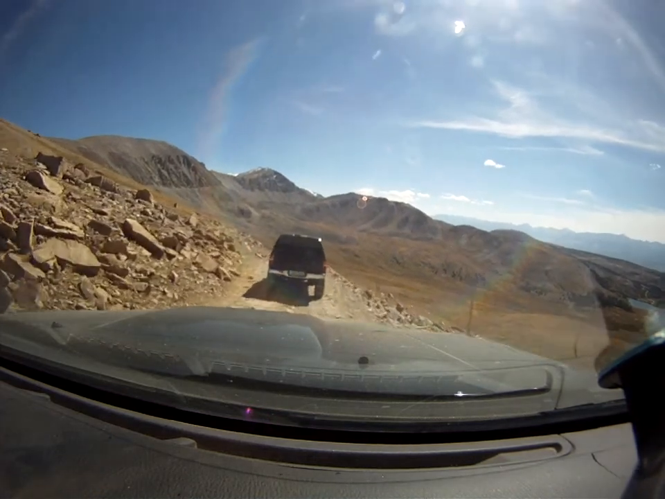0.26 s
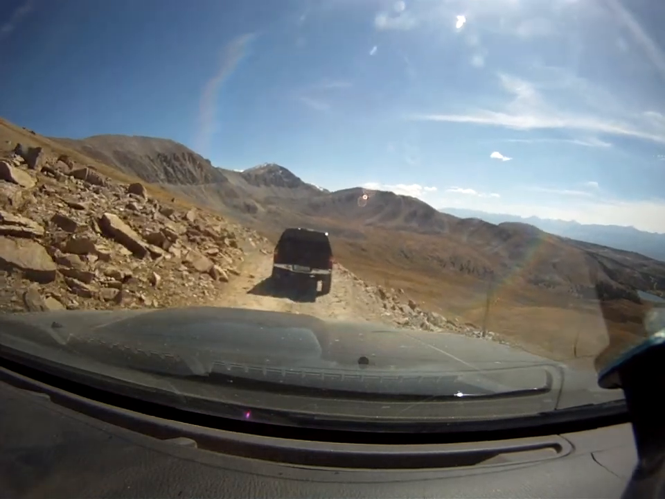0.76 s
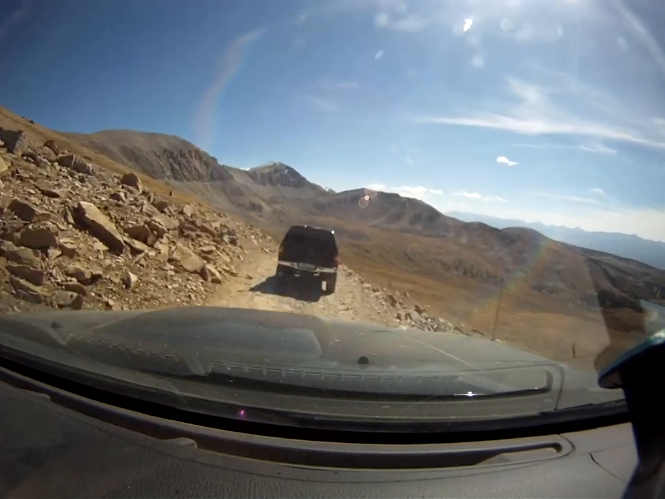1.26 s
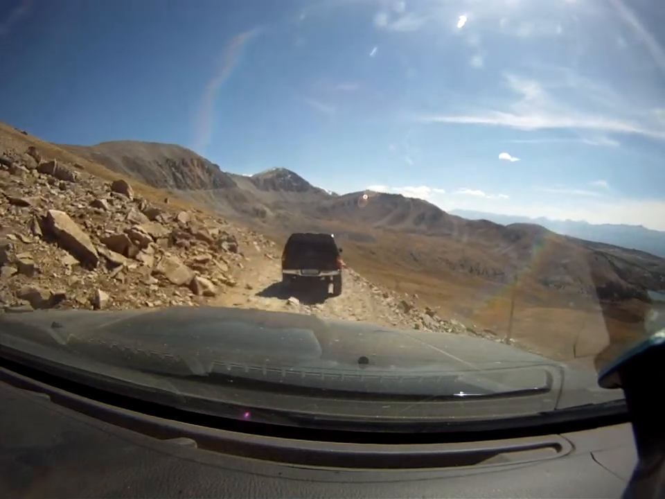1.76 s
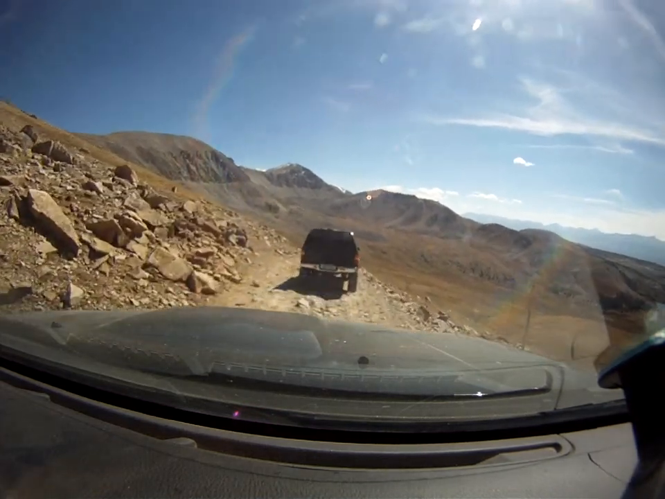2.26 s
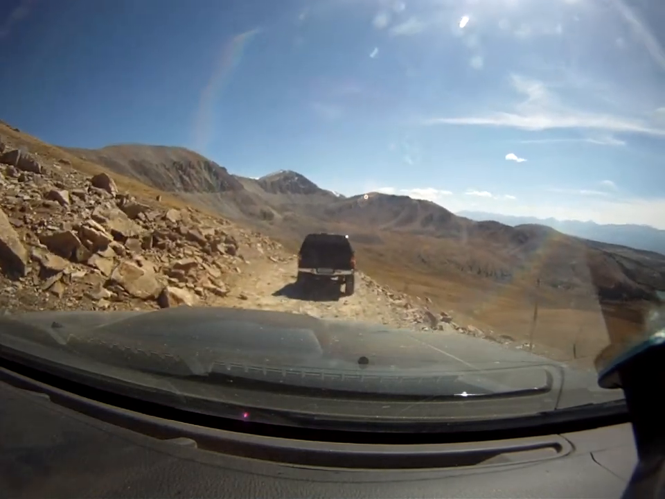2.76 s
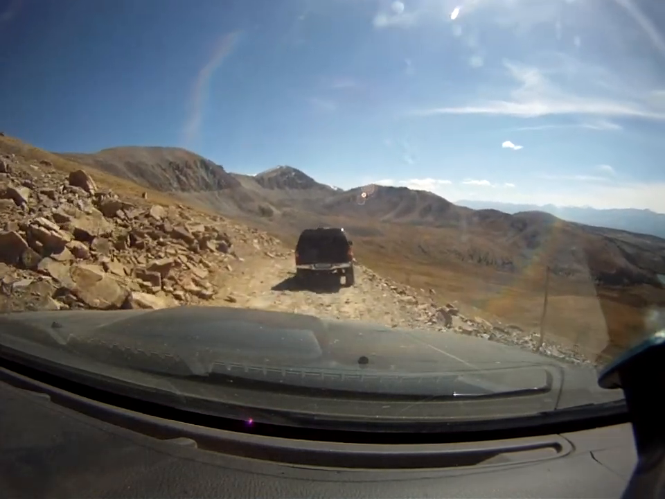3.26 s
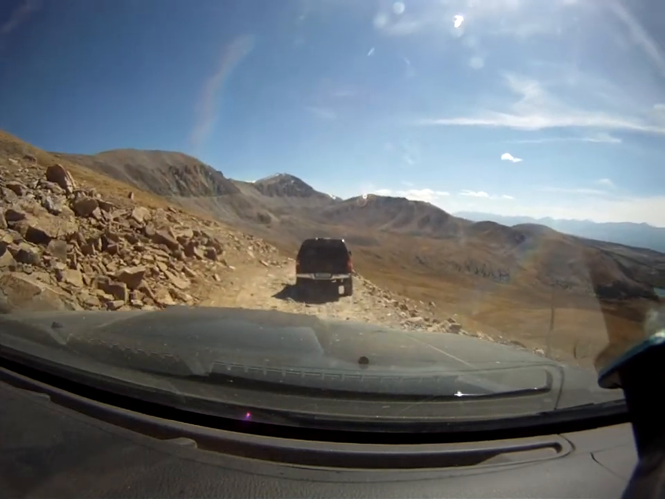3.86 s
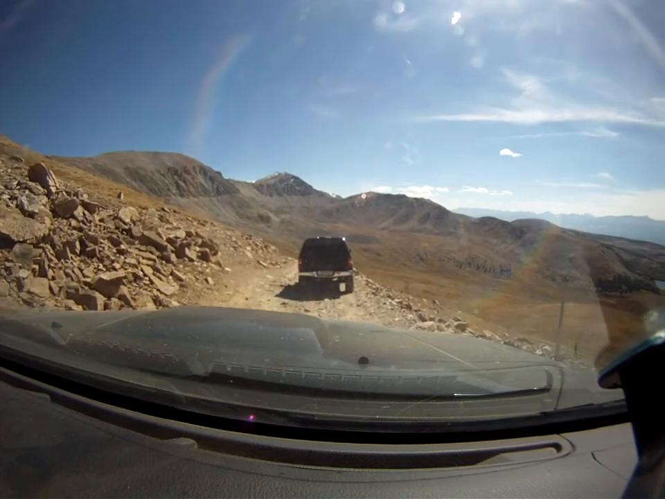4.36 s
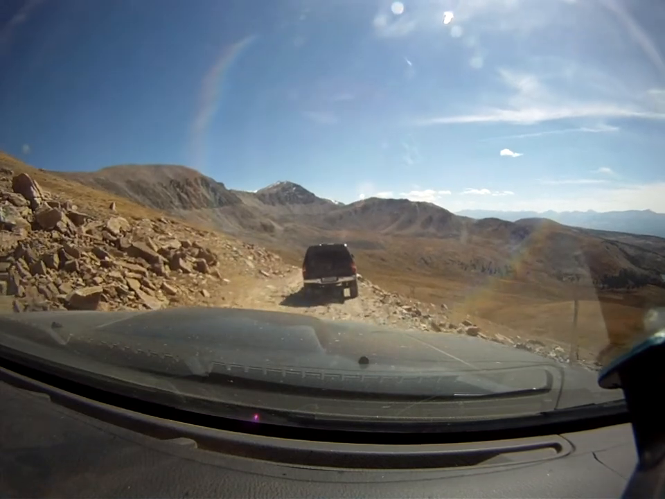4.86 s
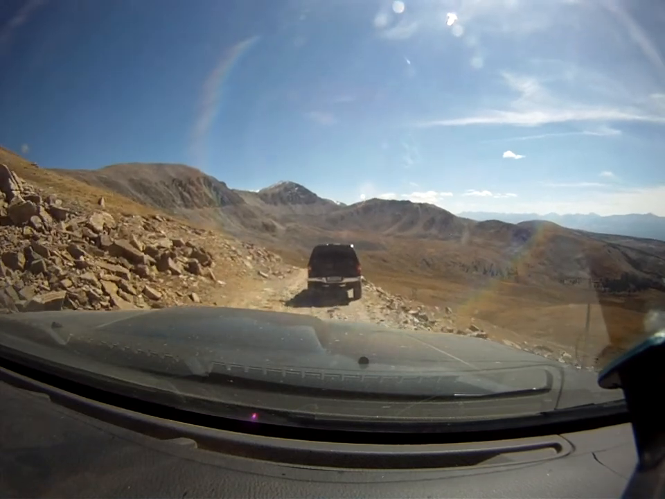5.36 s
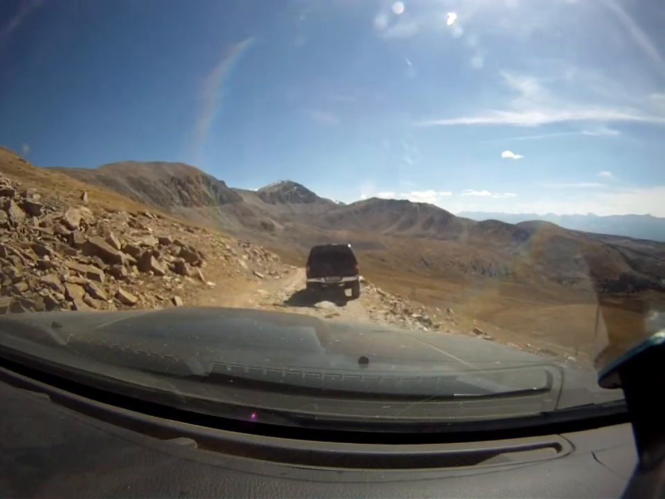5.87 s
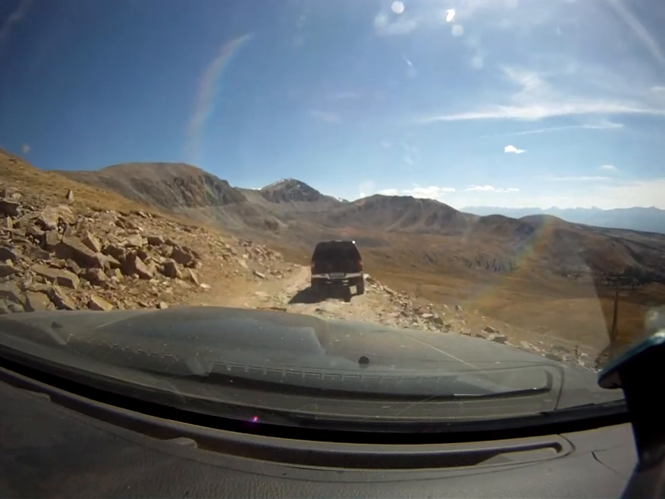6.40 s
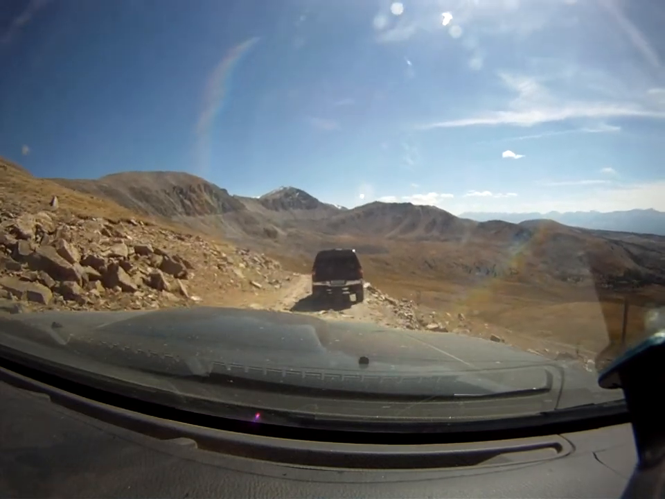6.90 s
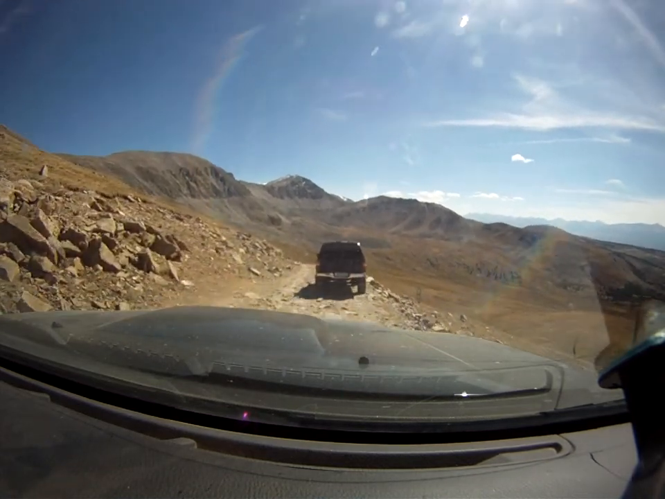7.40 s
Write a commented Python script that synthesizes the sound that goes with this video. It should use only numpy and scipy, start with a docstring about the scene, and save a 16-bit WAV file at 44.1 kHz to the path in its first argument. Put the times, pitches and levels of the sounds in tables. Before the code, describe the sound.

Inside a four-wheel drive crawling over rocks, a deep rumble and engine hum carry on under knocks, rattles and crunching stones.

```python
"""A deep rumble and an engine's hum fill the cab of a four-wheel drive crawling over a rocky track.
The body vibrates on its springs and booms as wheels drop off rocks; the hum sinks as the engine slows.
Tyres grind over loose stones, impacts of gear and trim ring the panels, and rubbing plastic squeaks.
A camera on the dashboard hears it all and holds each sample, which adds a thin fizz on top."""
import sys
import numpy as np
from scipy import signal
from scipy.fft import rfft, irfft, next_fast_len
from scipy.io import wavfile
from scipy.ndimage import uniform_filter1d, map_coordinates

SR = 44100
rng = np.random.default_rng(int(sys.argv[2]) if len(sys.argv) > 2 else 0)


def wrap_up_sound(samples):
    """Save the sound to the file named by the first command line argument, as 16-bit audio."""
    columns = np.atleast_2d(samples).T
    # keep every value between -1 and 1, then stretch to whole-number steps
    tamed = np.clip(columns, -1, 1)
    steps = np.round(tamed * 32767).astype(np.int16)
    wavfile.write(sys.argv[1], SR, steps)


N = 336924


# shaking of the body: t/s, relative level/dB
SHAKE_LEVELS = [(0.0, -33.5), (0.74, -27.5), (1.51, -34.5), (2.11, -39), (2.32, -33.5), (4.21, -35),
                (4.43, -41), (4.66, -37.5), (4.87, -36), (5.47, -33), (7.11, -39), (7.43, -35.5),
                (7.64, -37)]
# spectrum of the rumble: f/Hz, relative density/dB
RUMBLE_SPECTRUM = [(10, -4.5), (22, -2.5), (32, -0.5), (48, 0.5), (58, -4), (76, -12), (95, -13.5),
                   (140, -19), (190, -43), (300, -51)]
def body(gain_db=3.0, evenness=0.81, lurch_db=0.64):
    """Forced vibration: the ground shakes the body on its springs, harder where it is rough."""
    shake_db, = curves(SHAKE_LEVELS)
    sway = coloured(rng.standard_normal(N), RUMBLE_SPECTRUM)
    envelope = np.sqrt(np.abs(uniform_filter1d(sway ** 2, size=4000)) + 1e-6)
    return amp(shake_db + gain_db + lurch_db * wobble(9.7)) * unit(sway / envelope ** evenness)


# wheels drop off rocks: t/s, peak level/dB
WHEEL_DROPS = [(1.756, -23), (2.46, -23.5), (2.558, -21.5), (3.529, -29), (5.426, -19), (5.5, -25.5),
               (5.842, -16.5)]
def jolts(boom_hz=43, rise_s=0.024):
    """Transient response: each drop sets the cab booming for a few cycles."""
    out, t = np.zeros(N), np.arange(SR // 3) / SR
    envelope = (t / rise_s * np.exp(1 - t / rise_s)) ** 2
    for s, db in WHEEL_DROPS:
        add(out, s, amp(db) * envelope * np.sin(2 * np.pi * boom_hz * t))
    return out


# the fundamental under changing load: t/s, level/dB
ENGINE_LOAD = [(0, -34), (.75, -37.5), (1.45, -33), (1.9, -36.5), (3.1, -35.5), (4.1, -42), (4.35, -34),
               (4.9, -38), (5.45, -45.5), (5.95, -38), (6.45, -43.5), (6.95, -46), (7.64, -39)]
# harmonics 2 and 3 in the cab: level off resonance/dB, resonance f/Hz, bandwidth/Hz, lift/dB
CAB_RESONANCES = [(-56.5, 239.3, 4.2, 12.5), (-61.5, 356, 14, 11)]
# one surge of harmonic 2: t/s, half-width/s, lift/dB
HARMONIC_SURGE = (4.76, 0.12, 11.4)
def engine(start_hz=125.86, sag_hz_per_s=2.06, waver_db=1.33, overtone_waver_db=2.2):
    """Resonance: as the firing rate sags, two harmonics slide through modes of the cab and swell."""
    t = np.arange(N) / SR
    firing_hz = start_hz - sag_hz_per_s * t
    phase = 2 * np.pi * np.cumsum(firing_hz * (1 + .002 * wobble(12))) / SR
    levels = [curves(ENGINE_LOAD)[0] + waver_db * wobble(14)]
    for k, (db, centre_hz, width_hz, lift_db) in enumerate(CAB_RESONANCES, 2):
        swell_db = lift_db * resonance(k * firing_hz, centre_hz, width_hz)
        levels.append(db + swell_db + overtone_waver_db * wobble(9))
    surge_s, half_width_s, surge_db = HARMONIC_SURGE
    levels[1] += surge_db * np.exp(-((t - surge_s) / half_width_s) ** 2)
    return sum(amp(db) * np.sqrt(2) * np.sin(k * phase + rng.uniform(0, 2 * np.pi))
               for k, db in enumerate(levels, 1))


# tyres on the track: t/s, roll level/dB, relative grit level/dB
TRACK_LEVELS = [(0.0, -39.5, -55.5), (0.51, -41, -57), (0.76, -40.5, -56.5), (1.13, -41.5, -55.5),
                (1.62, -44.5, -59), (2.49, -43, -56.5), (2.7, -44, -58.5), (3.94, -41, -57.5),
                (4.4, -45.5, -59.5), (5.62, -43, -60), (5.98, -44, -55.5), (6.92, -45.5, -59),
                (7.28, -42, -54.5), (7.64, -45.5, -57)]
# spectra of roll, grit and sand: f/Hz, relative density/dB
ROLL_SPECTRUM = [(90, -13), (150, 8), (200, 3), (300, 4), (400, 0), (500, -0.5), (570, -7.5), (690, -17.5),
                 (850, -19), (1000, -29.5), (2000, -61)]
GRIT_SPECTRUM = [(300, -19), (700, 2.5), (1100, 3), (1500, 0), (2200, -1.5), (2850, 2), (3600, -7.5),
                 (5000, -9.5)]
SAND_SPECTRUM = [(2400, -27), (3400, -10), (4000, -19), (4900, -3.5), (5600, -3.5), (6600, 6.5)]
def tyres(grit_db=1.0, sand_db=-8.0, crunch_db=-6, lumps_db=2.0, scrape_db=1.48, drift_db=-1.5):
    """Rolling noise: stones shift under the tread with a dull roll, a crunch and a hiss of sand."""
    roll_level, grit_level = curves(TRACK_LEVELS)
    roll = coloured(rng.standard_normal(N), ROLL_SPECTRUM)
    crunch = amp(crunch_db) * stones()
    grit = amp(grit_db) * unit(coloured(rng.standard_normal(N), GRIT_SPECTRUM) + crunch)
    sand = amp(sand_db + drift_db * wobble(8.3)) * coloured(rng.standard_normal(N), SAND_SPECTRUM)
    scrape = amp(grit_level + scrape_db * wobble(24)) * (grit + sand)
    return amp(roll_level + lumps_db * wobble(17)) * roll + scrape


def stones(count=2400, centre_hz=1662, t60=0.021, spread_db=16.5):
    """Damped oscillation: stones collide at random, each ringing with its own pitch and strength."""
    out, t = np.zeros(N), np.arange(SR // 50) / SR
    envelope = (1 - np.exp(-t / 0.0012)) * amp(-60 * t / t60)
    for when, pitch, size in rng.random((count, 3)):
        hz = centre_hz * 3 ** (pitch - .5)
        add(out, when * N / SR, amp(spread_db * size ** 2) * envelope * np.sin(2 * np.pi * hz * t))
    return unit(out)


# gear strikes: t/s, base level/dB, thud offset/dB, snap offset/dB, ring offset/dB, ring f/Hz
GEAR_STRIKES = [(0.82, -38, 8.5, -26, 5, 720), (1.929, -40.5, -4, -27, -9, 1590),
                (2.262, -30, 0, -11, 0, 597), (2.995, -31.5, -14, -10.5, -5.5, 1400),
                (3.227, -29.5, -14, -11, -1, 2130), (3.487, -33, -12, -20, -12, 1390),
                (4.085, -36.5, -2.5, -17, -0.5, 870), (5.922, -35.5, -20, -5.5, -8, 2770),
                (5.968, -45, -2, -12, -6, 3400), (6.239, -32, -11.5, -7, -6, 3000),
                (6.476, -28.5, -10.5, -15, -10, 2000), (6.494, -37.5, -7.5, -10, 1, 2660),
                (6.592, -41.5, 4.5, -16, 8.5, 2680), (6.706, -28, -2, -14, 0, 600),
                (7.296, -31, 0, -23, -10, 2340), (7.364, -28, -6, -18, -4, 870),
                (7.406, -28, -11.5, -6, -9, 4020)]
def knocks(attack_s=0.0009, scatter_s=.01, clack_db=-21, thud_db=-8.0, snap_db=-16.5):
    """Impact excitation: loose gear hits the trim, and the short contact excites a wide band."""
    out = np.zeros(N)
    for s, db, thud, snap, ring, hz in GEAR_STRIKES:
        add(out, s, amp(db) * blow(attack_s, scatter_s, clack_db, thud + thud_db, snap + snap_db))
        add(out, s, amp(db + ring) * struck_part(hz))
    return out


def struck_part(hz, width_hz=300, t60=0.056, attack_s=0.0013):
    """Free vibration: the struck part, from hollow bin to small buckle, rings at its own pitch."""
    t = np.arange(SR // 16) / SR
    return amp(-60 * t / t60) * (1 - np.exp(-t / attack_s)) * resonant_noise(t, hz, width_hz)


# modes of the dashboard and cab: f/Hz, relative level/dB, T60/s
PANEL_MODES = [(252, -23, 0.053), (283.6, -5, 0.12), (354.6, -2, 0.09), (422.2, 0.5, 0.12),
               (488.4, 3.5, 0.062), (555.5, 0.5, 0.085), (641, -10, 0.067), (770, -24, 0.12),
               (840, -10, 0.077), (955, -17, 0.065)]
# spectra of a blow's clack and brighter snap: f/Hz, relative density/dB
CLACK_SPECTRUM = [(400, -34), (800, 4.5), (1400, 5.5), (2000, 4.5), (3000, 2), (3600, -12.5), (6600, -23.5)]
SNAP_SPECTRUM = [(1500, -18), (3000, -5), (4000, -2), (4800, -5), (6600, -8)]
def blow(attack_s, scatter_s, clack_db, thud_db, snap_db, echo_db=-10, echo_t60=.11):
    """Reflection and modal ringing: a blow scatters off glass and trim and sets the panels thudding."""
    t = np.arange(SR // 5) / SR
    onset = 1 - np.exp(-t / attack_s)
    early = onset * np.exp(-(t / scatter_s) ** 2)
    echo = onset * amp(echo_db - 60 * t / echo_t60)
    thud = np.zeros(len(t))
    for hz, db, t60 in PANEL_MODES:
        decay = amp(db + rng.normal(0, 2.1) - 60 * t / t60)
        thud += decay * np.sin(2 * np.pi * hz * rng.normal(1, 0.01) * t + rng.uniform(0, 2 * np.pi))
    clack = coloured((early + echo) * rng.standard_normal(len(t)), CLACK_SPECTRUM)
    # the seats absorb treble, so the snap has less echo
    snap = coloured((early + .5 * echo) * rng.standard_normal(len(t)), SNAP_SPECTRUM)
    return amp(clack_db) * clack + amp(thud_db) * unit(onset * thud) + amp(snap_db) * snap


# stones tip under the tyres: t/s, thud level/dB
TIPPING_STONES = [(0.547, -51.5), (0.849, -49.5), (1.273, -53), (1.842, -55), (1.972, -46), (2.174, -51.5),
                  (2.345, -49.5), (3.051, -48.5), (4.735, -50.5), (5.135, -47), (5.163, -49),
                  (5.464, -51.5), (5.775, -52), (6.786, -61), (7.126, -54), (7.558, -52)]
def thumps():
    """Vibration isolation: tyres cushion blows from below, leaving mostly the ring of the panels."""
    out = np.zeros(N)
    for s, db in TIPPING_STONES:
        add(out, s, amp(db) * blow(attack_s=.003, scatter_s=0.022, clack_db=-18, thud_db=0, snap_db=-31))
    return out


def rattles(count=30, spread_db=2):
    """Intermittent contact: light trim chatters at random, louder where the ground is gritty."""
    out = np.zeros(N)
    for s, db in random_contacts(count, spread_db):
        chatter = blow(attack_s=.0006, scatter_s=0.0066, clack_db=-13.5, thud_db=-10, snap_db=-23)
        add(out, s, amp(db) * chatter)
    return out


def ticks(count=24, t60=0.025, spread_db=4):
    """Rapid damping: tiny hard parts strike at random and die away at once, thin and dry."""
    out, t = np.zeros(N), np.arange(SR // 40) / SR
    for s, db in random_contacts(count, spread_db):
        add(out, s, amp(db - 60 * t / t60) * coloured(rng.standard_normal(len(t)), SNAP_SPECTRUM))
    return out


# rubbing trim: t/s, duration/s, f/Hz, bandwidth/Hz, level/dB
TRIM_RUBS = [(0.251, 0.13, 2000, 2000, -55.5), (0.537, 0.029, 4600, 505, -56),
             (0.599, .09, 2180, 1800, -54), (1.18, 0.023, 4500, 600, -59), (1.305, 0.18, 4900, 900, -66),
             (1.997, 0.11, 2300, 280, -56.5), (3.236, 0.051, 2680, 900, -56),
             (4.193, 0.095, 2330, 400, -62), (4.708, 0.06, 1620, 900, -53.5),
             (5.836, .04, 4300, 1500, -57.5), (5.92, 0.084, 2800, 1100, -56),
             (6.89, .05, 2070, 1600, -49.5)]
def squeaks():
    """Friction: the twisting body rubs plastic on plastic; narrow bands squeak, wide ones scrape."""
    out = np.zeros(N)
    for s, length, hz, width_hz, db in TRIM_RUBS:
        t = np.arange(round(length * SR)) / SR
        add(out, s, amp(db) * np.sin(np.pi * t / length) * resonant_noise(t, hz, width_hz))
    return out


def random_contacts(count, spread_db):
    """Yield t/s, level/dB: one random contact per equal time slot, near the grit level."""
    _, grit_level = curves(TRACK_LEVELS)
    for slot, (when, size) in enumerate(rng.random((count, 2))):
        start = int((slot + when) * N / count)
        yield start / SR, grit_level[start] + spread_db * (2 * size - 1)


def resonance(hz, centre_hz, width_hz):
    """Lorentzian curve: 1 at the centre, 1/2 at the band edges."""
    return 1 / (1 + (2 * (hz - centre_hz) / width_hz) ** 2)


def resonant_noise(t, hz, width_hz):
    """Band-pass noise, like a cluster of close resonances, at rms 1."""
    return unit(filtered(rng.standard_normal(len(t)), lambda f: resonance(f, hz, width_hz)))


def amp(db):
    """Decibels to amplitude ratio."""
    return 10 ** (np.asarray(db) / 20)


def unit(x):
    """Normalisation to rms 1."""
    return x / np.sqrt(np.mean(x ** 2) + 1e-20)


def curves(rows):
    """Linear interpolation: one value per sample for each column after the time."""
    times, *columns = np.transpose(rows)
    return [np.interp(np.arange(N) / SR, times, column) for column in columns]


def wobble(rate):
    """Random modulation: a smooth curve with rate knots a second."""
    knots = rng.standard_normal(int(N * rate / SR) + 4)
    return map_coordinates(knots, [np.arange(N) * rate / SR])


def filtered(x, response):
    """Linear filtering: the spectrum of x times a frequency response."""
    size = next_fast_len(len(x) + 8192)
    return irfft(rfft(x, size) * response(np.fft.rfftfreq(size, 1 / SR)), size)[:len(x)]


def coloured(x, spectrum):
    """Spectral shaping by points (f/Hz, level/dB) on a log axis, at rms 1."""
    f, db = np.transpose(spectrum)
    return unit(filtered(x, lambda hz: amp(np.interp(np.log(hz + 1), np.log(f), db, left=-40, right=-80))))


def add(out, s, sound):
    """Mix a sound in at time s."""
    part = out[round(s * SR):][:len(sound)]
    part += sound[:len(part)]


def scene():
    """Superposition: all sources sum at the dashboard."""
    driving = engine() + body() + jolts() + tyres()
    return (driving + knocks() + thumps() + rattles() + ticks() + squeaks())[None]


def record(dry, edge_hz=5400, hold_hz=12000, top_hz=15500):
    """Zero-order hold: the camera holds each slow sample, mirroring the sound faintly into the treble."""
    fade_in = np.minimum(np.arange(N) / 200, 1)
    band_limited = filtered(dry[0] * fade_in, lambda hz: 1 / np.sqrt(1 + (hz / edge_hz) ** 30))
    slow = signal.resample_poly(band_limited, hold_hz, SR, window=("kaiser", 3))
    held = signal.resample_poly(np.repeat(slow, 4), SR, 4 * hold_hz)[:N]
    return filtered(held, lambda hz: 1 / np.sqrt(1 + (hz / top_hz) ** 160))[None]


dry = scene()
out = record(dry)
wrap_up_sound(out)
```